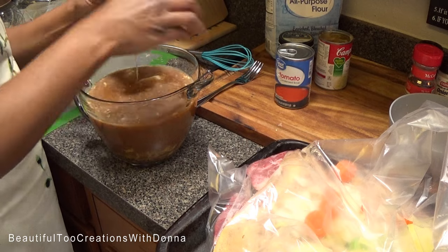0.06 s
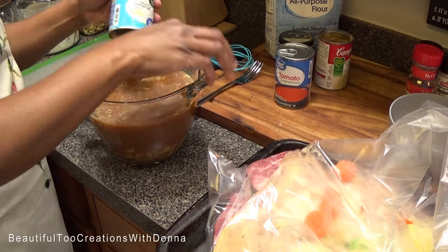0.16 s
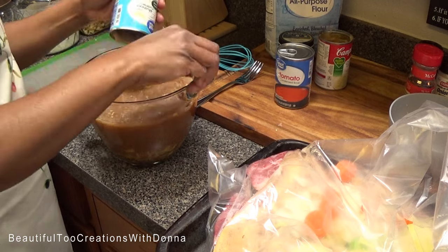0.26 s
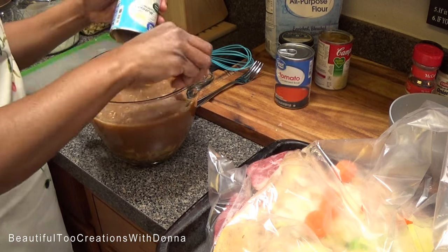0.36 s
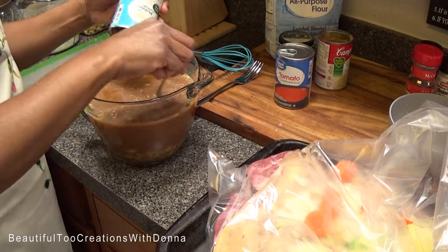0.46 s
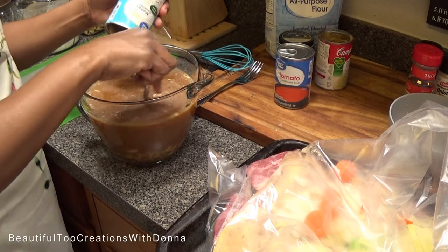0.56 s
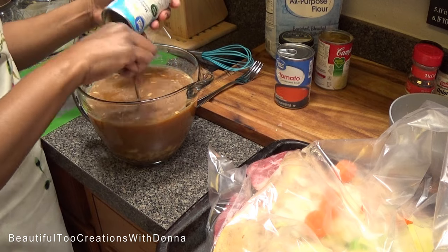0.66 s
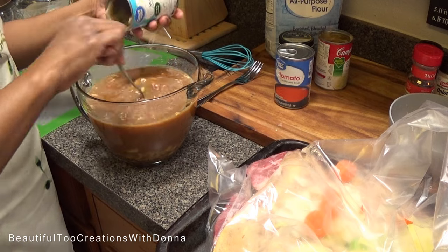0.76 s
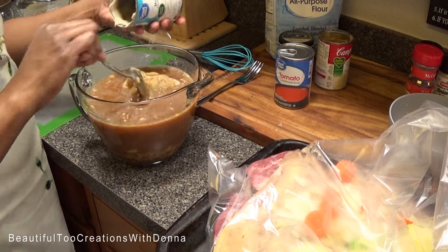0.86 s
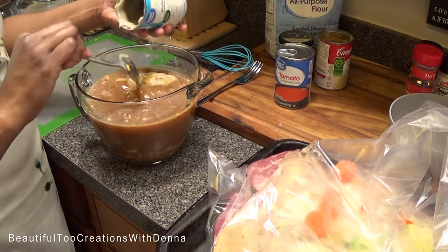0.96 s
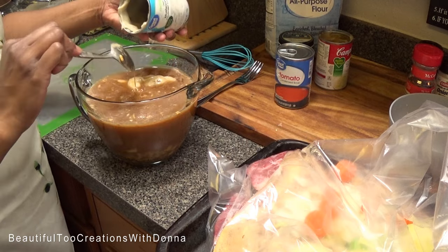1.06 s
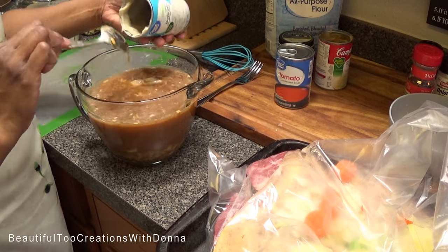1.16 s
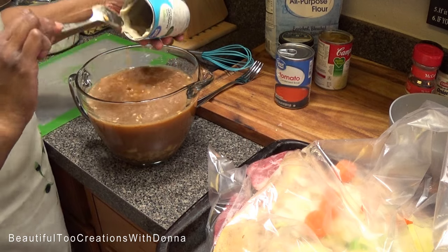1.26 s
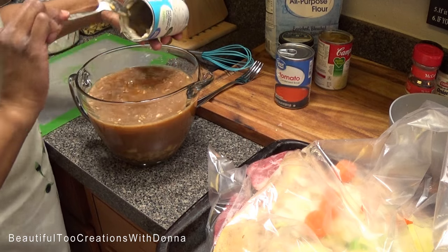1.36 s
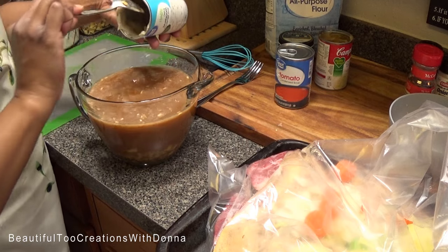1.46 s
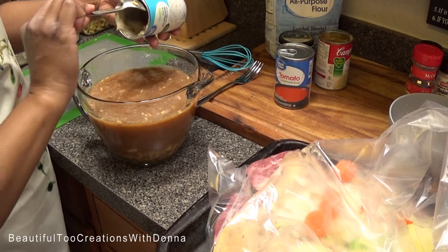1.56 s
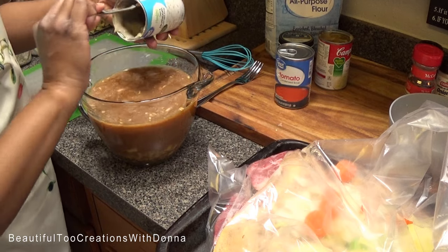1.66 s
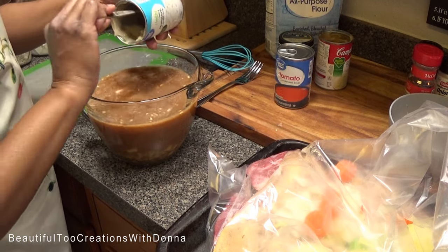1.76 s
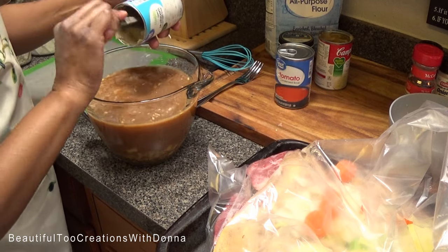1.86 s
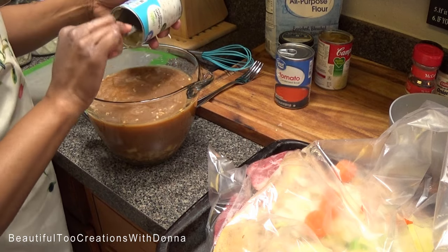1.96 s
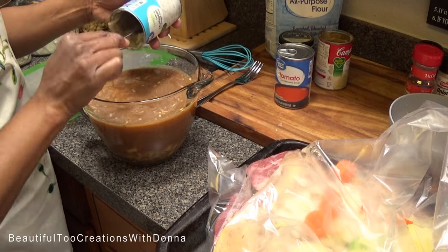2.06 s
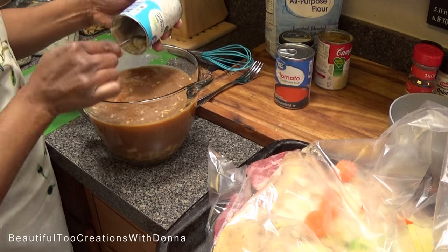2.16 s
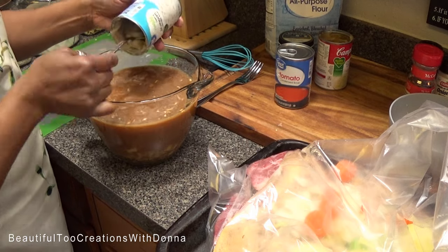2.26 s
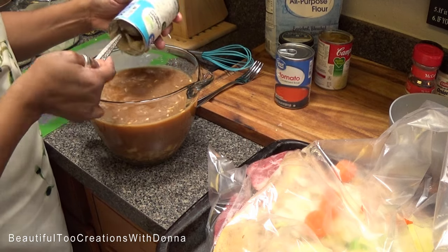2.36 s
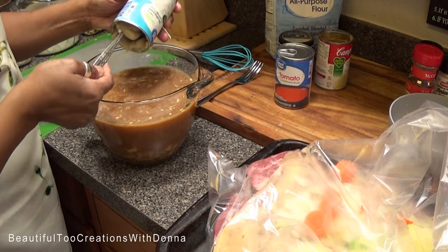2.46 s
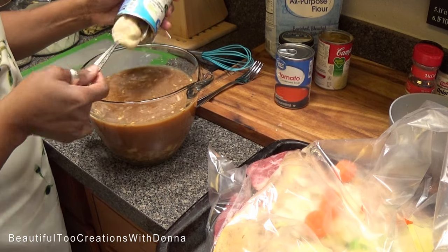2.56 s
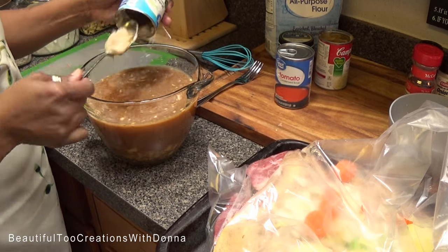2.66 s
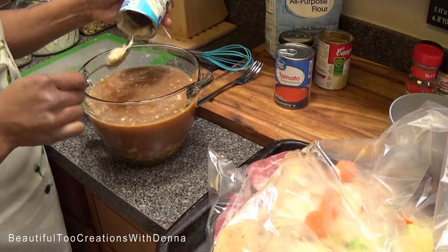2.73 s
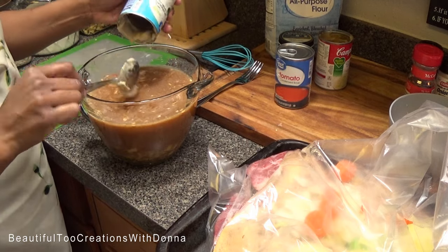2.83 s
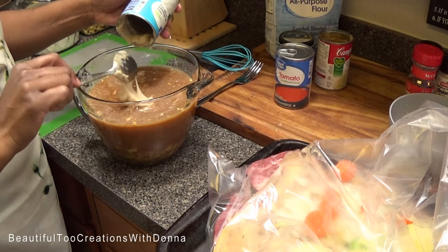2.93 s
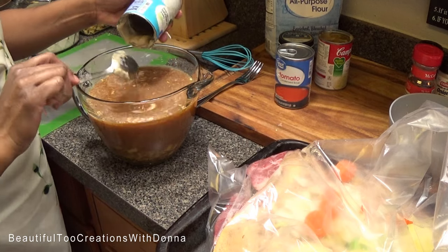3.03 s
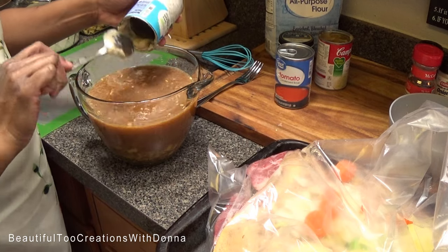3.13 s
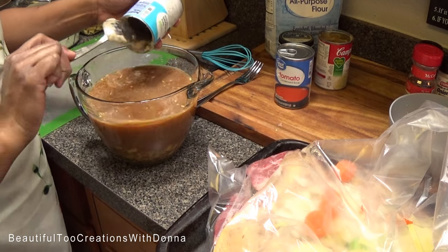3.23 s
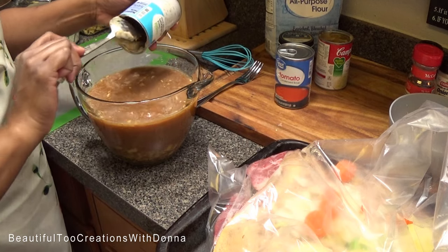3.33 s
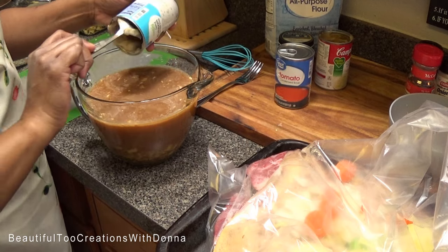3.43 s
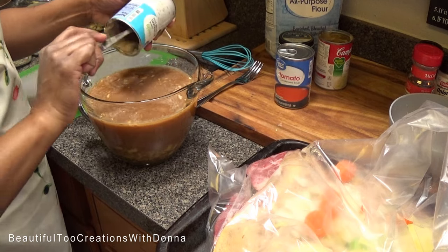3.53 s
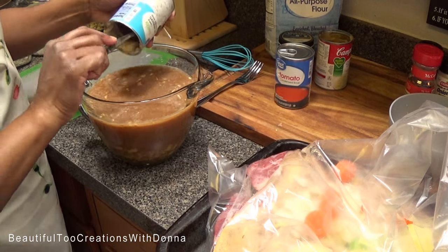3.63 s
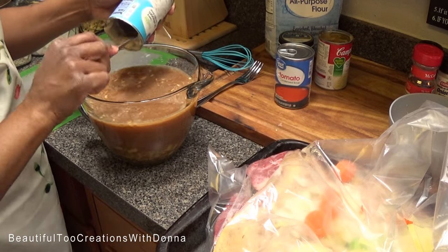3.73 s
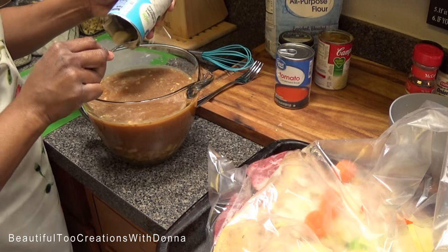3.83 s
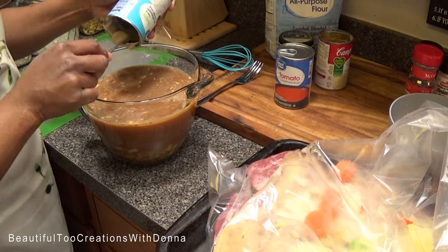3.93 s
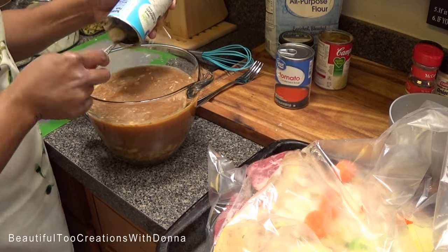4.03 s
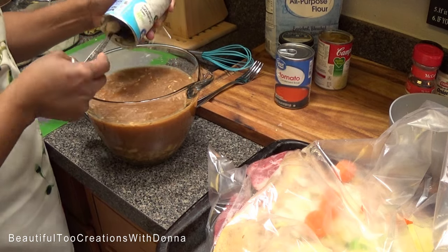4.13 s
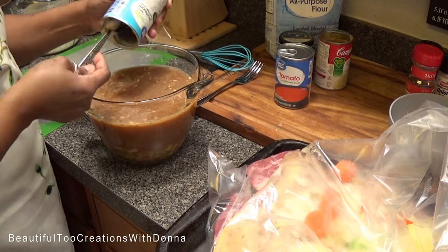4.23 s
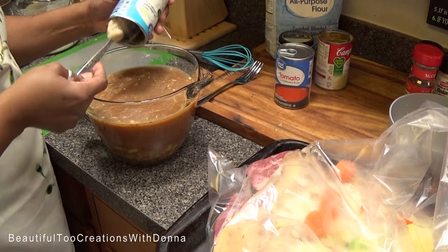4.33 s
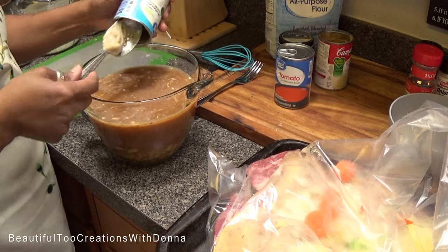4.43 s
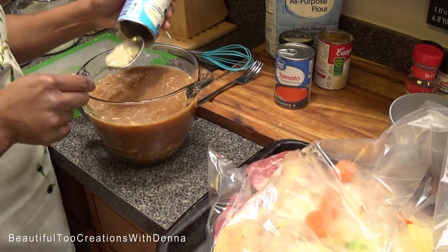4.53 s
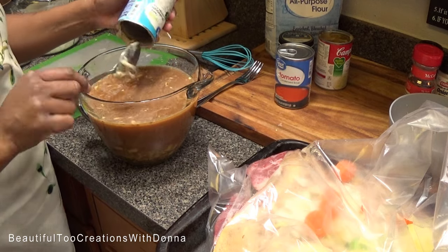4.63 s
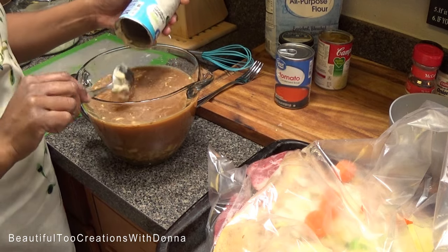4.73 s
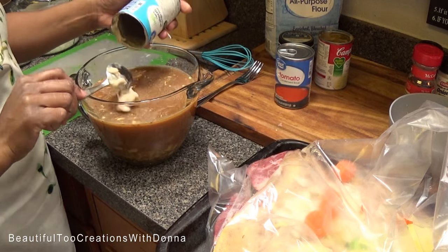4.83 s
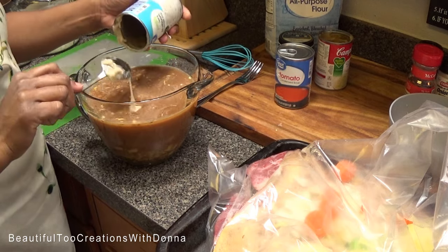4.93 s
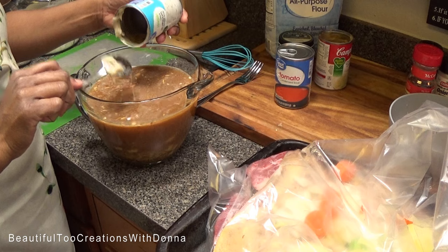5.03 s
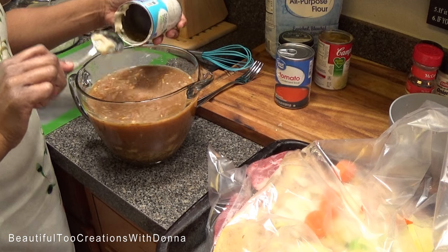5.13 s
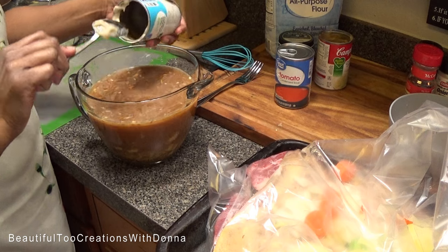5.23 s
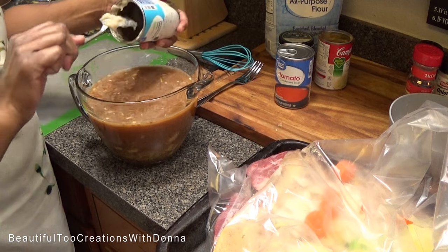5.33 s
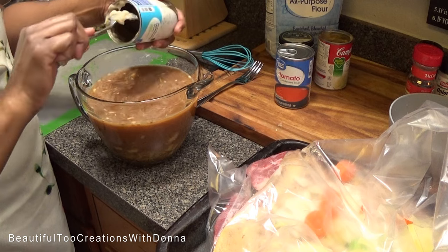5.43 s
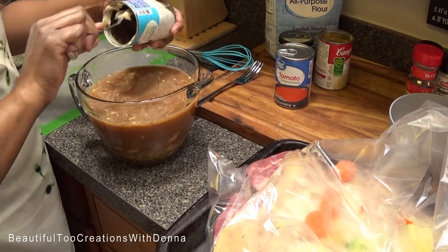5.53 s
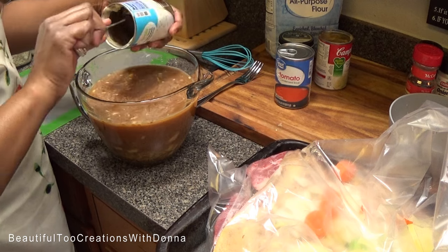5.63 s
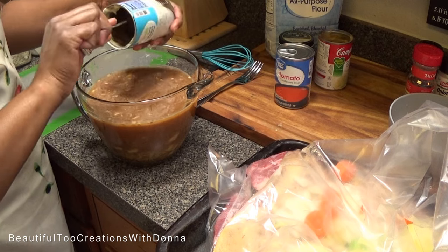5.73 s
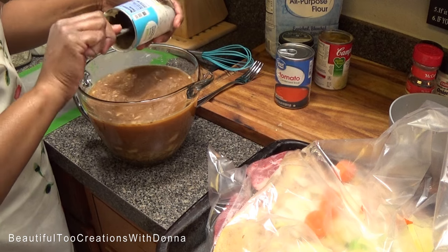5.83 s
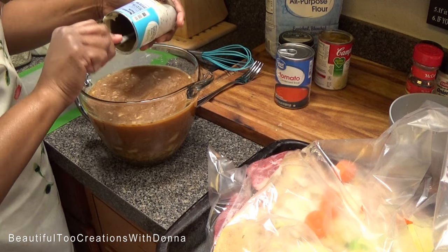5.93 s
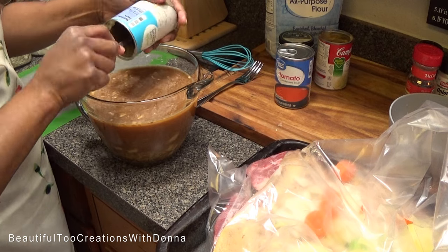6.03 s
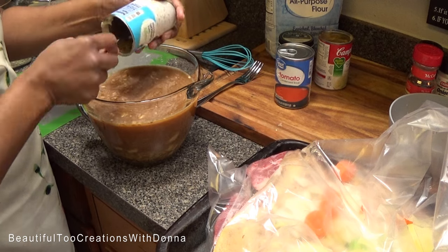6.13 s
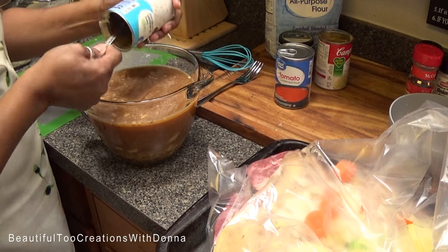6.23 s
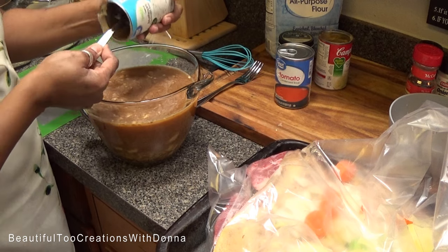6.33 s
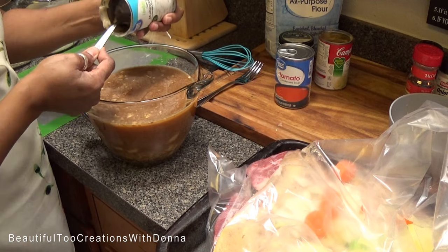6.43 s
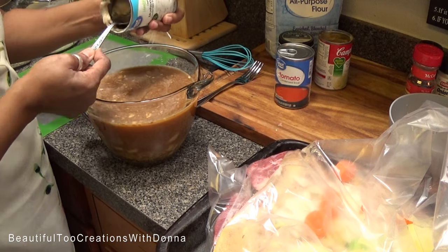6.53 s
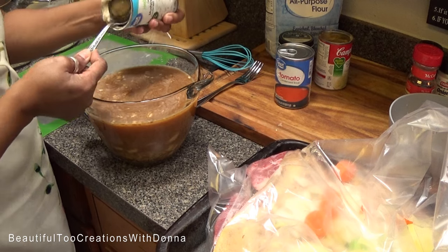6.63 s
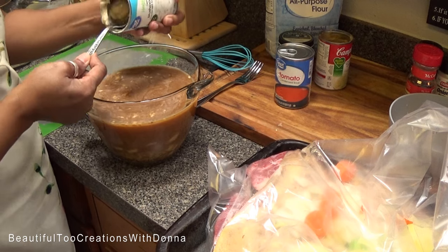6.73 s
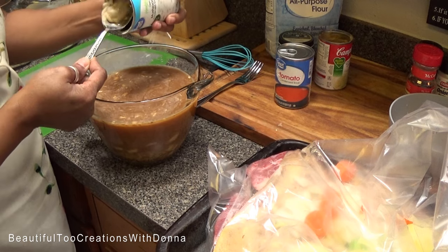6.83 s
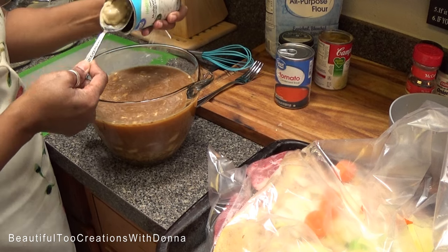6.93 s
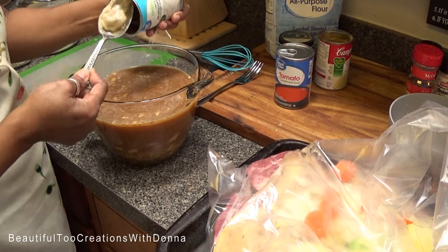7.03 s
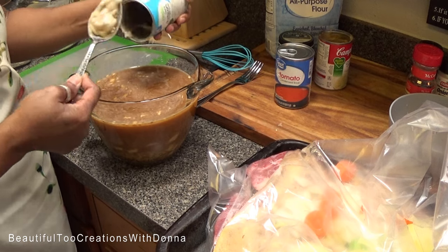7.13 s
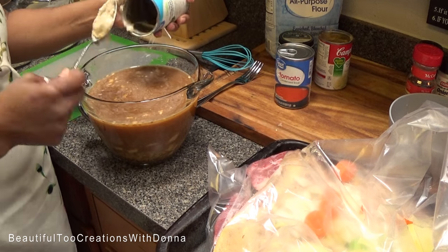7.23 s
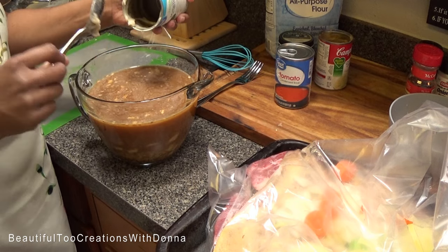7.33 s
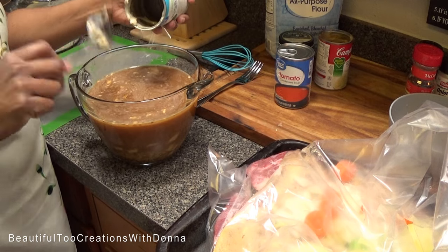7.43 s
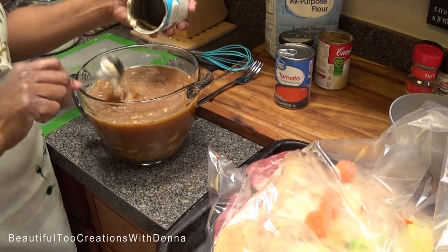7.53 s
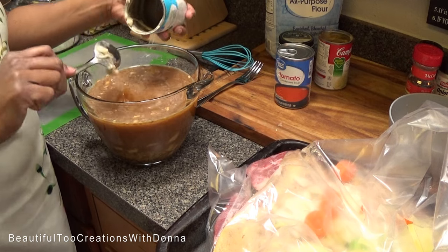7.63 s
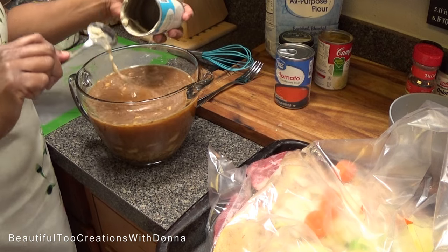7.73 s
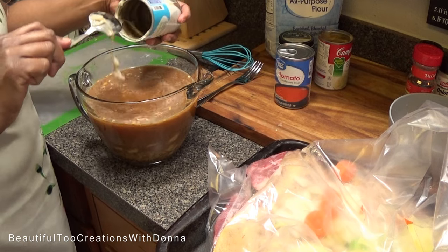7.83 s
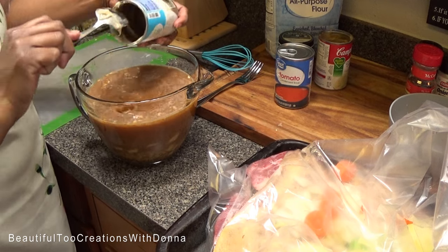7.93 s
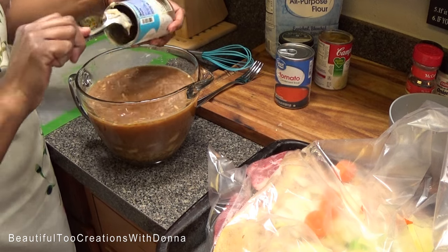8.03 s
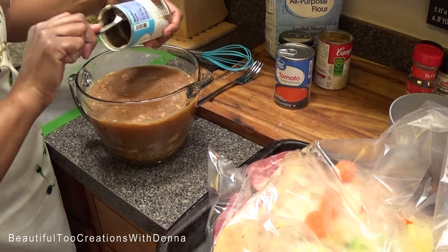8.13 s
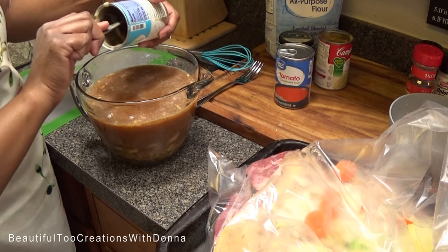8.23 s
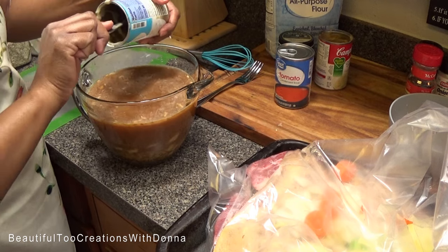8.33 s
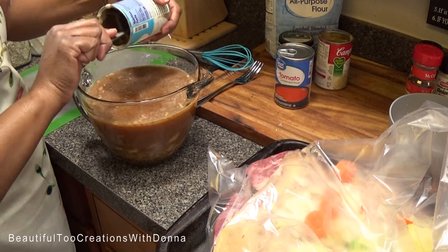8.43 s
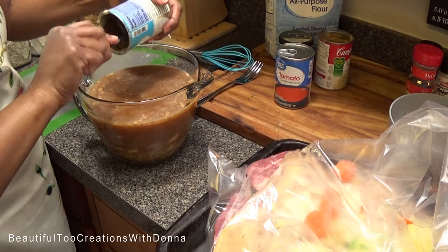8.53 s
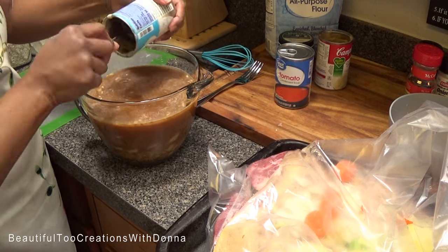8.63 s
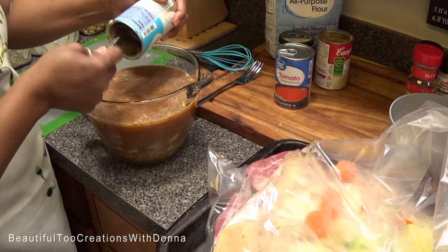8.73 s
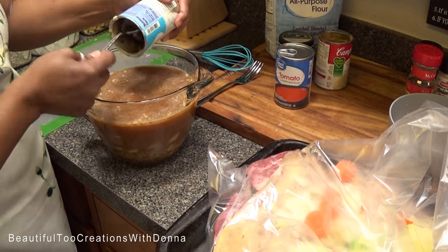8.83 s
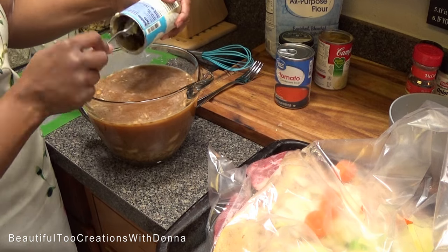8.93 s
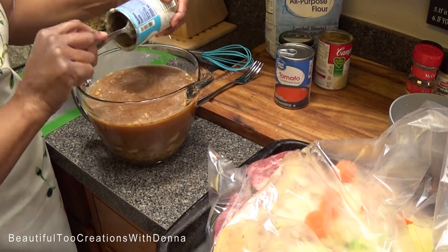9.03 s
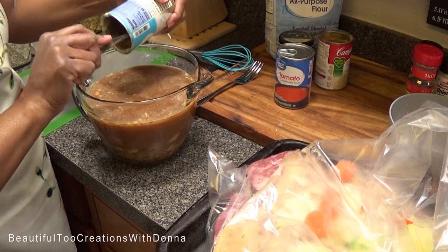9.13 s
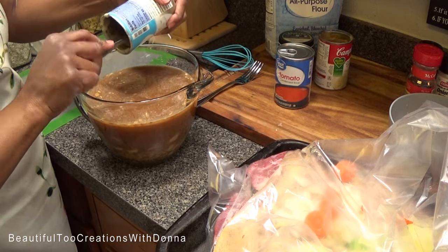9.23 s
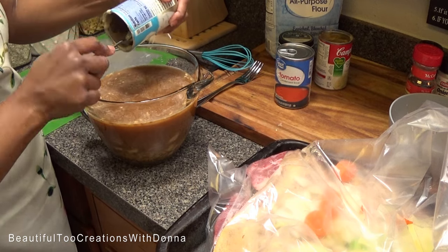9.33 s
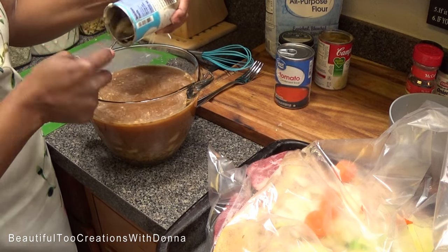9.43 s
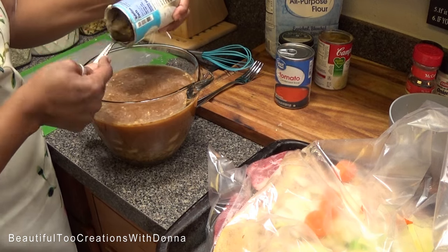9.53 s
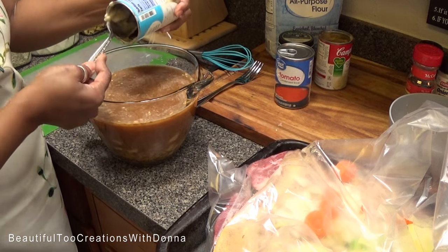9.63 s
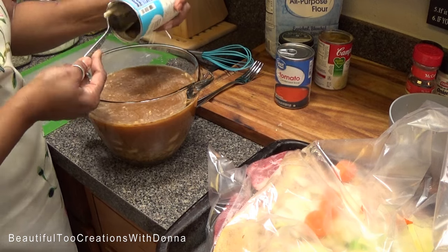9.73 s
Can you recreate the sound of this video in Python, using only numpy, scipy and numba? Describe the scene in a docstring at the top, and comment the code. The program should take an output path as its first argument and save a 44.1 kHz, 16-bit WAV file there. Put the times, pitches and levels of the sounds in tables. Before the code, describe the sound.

A steel spoon works inside a tin can in a kitchen, about a metre from the microphone. It opens with faint scraping, then a soft slosh of soup and small wet smacks around 1 second. At 1.5 seconds a sharp, ringing clink starts a cluster of squeaky scrapes, followed by a soft low bump at 2.3. Separate hollow knocks and scrapes come near 2.6, 3.5 and 4.4 seconds. After a lull, the spoon gets busy from 5.8 to 7.3 seconds, rasping and squeaking along the wall between hard clinks. Another run begins at 8 seconds, with the sharpest knocks around 8.4 and 8.5, then lighter scrapes and taps continue to about 9.8. The room adds a short tail. Faint hiss and a thin high whine run throughout, joined from about 1.4 seconds by faint, rapid lens motor ticking beside the microphone.

```python
"""Spoon in a tin can

A kitchen, stereo camera microphone a metre from a tin can held over a bowl of soup. A steel spoon knocks,
scrapes and squeaks inside: blows and stick-slip friction ring the wall and the air it holds. Soup smacks
and sloshes softly. At the microphone, the lens motor ticks once a frame over faint hiss and whine."""
import sys
import numpy as np
from scipy import signal
from scipy.fft import rfft, irfft, next_fast_len
from scipy.io import wavfile
from scipy.ndimage import uniform_filter1d
from numba import njit

SR = 44100
rng = np.random.default_rng(int(sys.argv[2]) if len(sys.argv) > 2 else 0)


def waveform_to_disk(signal):
    """Save audio, clipped to [-1, 1], as 16-bit WAV at the path in sys.argv[1]."""
    frames = np.transpose(np.atleast_2d(signal))
    scaled = np.clip(frames, -1, 1) * 32767
    samples = np.round(scaled).astype(np.int16)
    wavfile.write(sys.argv[1], SR, samples)


N = 431281
T = np.arange(N) / SR
STEP = 64  # samples per control step
STEP_T = T[::STEP]

# room tone and microphone noise: (frequency [Hz], relative density [dB])
HISS_SPECTRUM = [(25, -31), (60, -5), (130, -13), (300, 0), (640, 2), (1330, 1), (2900, 1), (4700, -2),
                 (8000, -5), (14800, -12.5), (16000, -13.5)]
# slow swell of the hiss: (time [s], gain [dB])
HISS_SWELL = [(0, -3.5), (1.2, -3.5), (2, -4), (4.7, -0.5), (5.4, -2.5), (5.6, -4), (7.5, 0), (9.8, 0)]
# stereo width of the hiss: (frequency [Hz], side against mid [dB])
HISS_WIDTH = [(60, -11), (400, -5), (1300, -2), (4400, -8), (12000, -24)]
# faint hum and whines: (frequency [Hz], rms level [dB])
WHINES = [(120, -87.5), (5846, -72.5), (7865, -79)]
# lens motor ticks, right by the microphone: (time [s], level [dB])
LENS_LEVEL = [(0, -78), (1.3, -68), (1.36, -51), (2.2, -47), (6, -48.5), (9.8, -46)]
# direct sound at the two microphone ports: (frequency [Hz], left phase lead [rad])
PORT_LEAD = [(60, -.3), (250, -.55), (700, -.77), (1500, -.73), (3000, -.55), (6000, -.3), (9000, -.3),
             (12000, -.12)]
# balance between the ports: (frequency [Hz], left minus right [dB])
PORT_PAN = [(250, 0), (700, -1.1), (1300, -.6), (2800, -1.5), (6000, -.3), (12000, 0.1)]
# low bump through the counter: (time [s], level [dB])
BUMP_LEVEL = [(2.1, -100), (2.298, -55.5), (2.55, -73)]
# soup being stirred: (time [s], level [dB])
SLOSH_LEVEL = [(0.7, -71), (0.82, -54.5), (1.0, -69)]
# wet smacks and small clicks: (time [s], peak level [dB], pitch [Hz])
SMACKS = [(0.964, -42.5, 2010), (1.227, -40, 8600), (1.3184, -38, 2830), (1.3324, -41, 3420),
          (1.433, -28.5, 4950), (1.794, -42, 1820), (3.161, -38, 1590), (3.2212, -32, 5200),
          (4.0143, -40, 8900)]
# clear modes of the can, air column near 700 Hz first, then the wall: (frequency [Hz])
MODE_HZ = [635, 712, 785, 850, 1185, 1240, 1297, 1770, 1900, 2090, 2140, 2218, 2375, 2475, 2636, 2842, 3050,
           3170, 3310, 3660, 3995, 4310, 4700, 4893, 5200, 5394, 5695, 6290, 7076, 7600]
# ring of each of those modes: (gain [dB], t60 [s])
MODE_RING = [(-14, 0.5), (13.5, 0.037), (1.5, 0.11), (10, 0.11), (-5.5, 0.33), (8, 0.086), (-22, 0.26),
             (11, 0.019), (-2.5, 0.18), (7, 0.045), (-2.5, 0.23), (-8, 0.29), (4, 0.07), (-7.5, 0.061),
             (7, 0.015), (-4, 0.089), (5, 0.082), (10.5, 0.013), (5.5, 0.055), (17.5, 0.0078), (10, 0.034),
             (2, 0.064), (14.5, 0.0082), (15, 0.012), (5, 0.033), (5, 0.027), (14.5, 0.0082), (10.5, 0.019),
             (-3.5, 0.08), (5, 0.0038)]
# dull thud of can and hand: (frequency [Hz], gain [dB], t60 [s])
THUD_MODES = [(338, 0.5, 0.028), (75, -33, 0.03)]
# air note of the can, higher while the spoon is deep inside: (time [s], pitch [Hz])
AIR_PITCH = [(0, 705), (1.55, 836), (2.1, 775), (2.62, 661), (3.47, 700), (3.58, 682), (4.3, 691),
             (4.46, 667), (5.8, 789), (6.15, 710), (6.3, 833), (6.46, 723), (6.62, 674), (6.86, 598),
             (7.1, 676), (8.1, 877), (8.6, 720), (9.05, 799), (9.17, 677), (9.78, 669)]
# bands of a contact's colour (air, low wall, mid wall, upper wall, rasp, top): (frequency [Hz])
COLOUR_HZ = [700, 1250, 2500, 5000, 9000, 15000]
# clear notes, the spoon sliding on one patch of wall:
# (start [s], slide [s], level [dB], first pitch [Hz], last pitch [Hz], t60 [s])
SLIDES = [(1.545, 0.045, -26.5, 2830, 2857, 0.073), (1.545, 0.086, -48, 2065, 2030, 0.25),
          (1.542, 0.013, -31.5, 840, 833, 0.35), (1.925, 0.0087, -20, 2660, 2660, 0.046),
          (1.995, 0.025, -31, 3010, 3000, .04), (2.012, 0.033, -39, 2116, 2085, 0.19),
          (3.6, 0.071, -54, 2060, 1960, 0.19), (5.836, 0.01, -17.5, 2160, 1914, 0.025),
          (5.895, 0.047, -32, 2360, 2990, 0.022), (6.003, 0.028, -29, 1254, 1234, 0.096),
          (6.153, 0.0066, -12.5, 2950, 2935, 0.024), (6.915, 0.055, -29, 2730, 2214, 0.028),
          (8.078, 0.086, -33, 2167, 2210, 0.2), (8.465, 0.036, -35.5, 1900, 1730, .015),
          (8.47, 0.05, -27, 2140, 2970, .015), (8.487, .018, -29, 3750, 3440, .015),
          (8.526, 0.051, -25.5, 1271, 1293, 0.23), (8.53, 0.022, -23.5, 3330, 3354, 0.036)]
# scrapes along the wall; air, low wall and upper wall count from the level at 2.5 kHz: (start [s],
# swell [s], hold [s], level [dB], air [dB], low wall [dB], upper wall [dB], pitch [Hz], upper pitch [Hz])
STROKES = [(0.0, 0.0013, 0.095, -62, -0.5, 2.5, 9.5, 2900, 3900),
           (0.2, 0.069, 0.032, -59, 0, 6, 5, 2810, 4500),
           (1.542, 0.0028, 0.058, -33.5, -10.5, -7.5, 5.5, 2795, 3920),
           (1.64, 0.023, 0.087, -69, 6, 15, -10, 2880, 3800),
           (1.861, 0.004, 0.092, -51.5, 2, -1, -4, 2900, 5740),
           (1.929, 0.0039, 0.022, -29, -13, -22, -11, 2793, 5070),
           (1.959, 0.013, 0.023, -28.5, -32, -14, -14.5, 2620, 4870),
           (1.99, 0.0073, 0.012, -32, -30, -3, -7, 2975, 7500),
           (2.03, 0.0063, 0.037, -47, -6, 4, -5, 2250, 4170),
           (2.09, 0.021, .47, -57.5, 3.5, 1.5, 3, 2803, 4600),
           (2.57, 0.078, 0.024, -31, -4.5, -8.5, -4, 2790, 4440),
           (3.462, 0.002, 0.019, -34.5, -2, 7, 6.5, 2900, 3890),
           (3.505, 0.028, 0.048, -37, -3, -6.5, 6.5, 2016, 4200),
           (3.66, 0.057, 0.06, -61.5, 2.5, 4, -1, 1960, 4150),
           (3.844, 0.013, 0.051, -51.5, 4.5, -11, -3.5, 2900, 5230),
           (4.08, 0.016, 0.088, -59, 1.5, -7, -1, 2820, 5300),
           (4.17, 0.082, 0.067, -48.5, 6, 7.5, -1, 2870, 4450),
           (4.369, 0.047, 0.033, -44, -1, 2, -4.5, 2540, 4700),
           (4.44, 0.0041, 0.049, -31, -6.5, -6, 0.5, 2682, 4660),
           (5.2, 0.041, .2, -62, -6, 3, 1, 2710, 8050),
           (5.749, 0.033, 0.024, -42, 0.5, -2.5, -4, 2470, 6030),
           (5.839, 0.0052, 0.075, -34, -22, -26, -16, 2050, 3700),
           (5.89, 0.02, 0.025, -29.5, -12.5, -30, -11, 2140, 4770),
           (5.96, 0.022, 0.022, -37, -25, -2, -3.5, 3300, 4470),
           (6.005, 0.0046, 0.18, -43, -10, 0.5, 1.5, 2980, 5170),
           (6.158, 0.003, 0.035, -40, 4, -5, 4.5, 2100, 6400),
           (6.22, 0.0094, 0.12, -46.5, 1.5, -5, -3.5, 1900, 4000),
           (6.319, 0.024, 0.032, -38.5, -8.5, 2, -7, 3106, 4950),
           (6.45, 0.0082, 0.12, -50, 3.5, 2.5, -5, 2180, 3800),
           (6.549, 0.015, 0.058, -40.5, 0, -4.5, -10, 2950, 4600),
           (6.65, 0.029, 0.086, -48.5, 6, 1, -5, 2930, 4440),
           (6.84, 0.042, 0.036, -31.5, -5, -7.5, -8.5, 2916, 5050),
           (6.919, 0.011, 0.048, -32, -8, -4.5, -2, 2930, 4800),
           (7.009, 0.0084, 0.094, -40.5, 1.5, -2, -3.5, 2990, 4900),
           (7.072, 0.0092, 0.045, -27, -5.5, -3, -8.5, 2205, 4650),
           (7.14, 0.03, 0.055, -31.5, -14, -3.5, 0.5, 2153, 4000),
           (7.216, 0.006, 0.026, -37.5, -2.5, 9, 3.5, 2180, 6600),
           (7.689, 0.0044, 0.012, -51, -11, -4, 6, 3370, 3800),
           (8.066, 0.0045, 0.045, -25.5, -22, -10, 5, 2180, 5430),
           (8.127, 0.0062, 0.027, -28.5, -21, -6.5, 7.5, 2180, 5220),
           (8.22, 0.024, 0.15, -52.5, -4, 0, -0.5, 2180, 5720),
           (8.378, 0.0039, 0.036, -26, -18, -23, -8.5, 2390, 4060),
           (8.448, 0.09, 0.033, -29, -12, -32, 5.5, 2380, 4140),
           (8.527, 0.0025, 0.025, -22, -16, -16, -3, 2540, 6840),
           (8.634, 0.0034, 0.11, -40, -7.5, -8, -1.5, 2460, 6700),
           (8.735, 0.0039, 0.053, -35.5, -13.5, -22, 4.5, 1940, 4000),
           (8.856, 0.0037, 0.11, -50.5, 4, 5.5, 1, 2950, 4600),
           (8.98, 0.014, 0.061, -38.5, 1.5, -2, -3, 2510, 5100),
           (9.109, 0.0049, 0.052, -43, 0, -4, -2, 2940, 4500),
           (9.23, 0.016, 0.16, -60, -2, -9, -33, 2940, 5850),
           (9.34, 0.0088, 0.021, -49, 8, 12, 1.5, 1810, 4850),
           (9.429, 0.0042, 0.0092, -54, 11.5, 9, 0.5, 3240, 4900),
           (9.499, 0.045, 0.02, -47, 10.5, 6.5, -1, 2220, 4650),
           (9.578, 0.0046, 0.019, -36, 0, 2.5, -2.5, 2730, 4620),
           (9.64, 0.025, 0.074, -42, 7, -9, -4.5, 2915, 4620),
           (9.74, 0.023, .03, -43, 0, -8, -3, 2590, 5660)]
# knocks on the wall, coloured in the same way:
# (time [s], level [dB], air [dB], low wall [dB], upper wall [dB], pitch [Hz], upper pitch [Hz])
BLOWS = [(1.538, -3, 0, -7.5, -1.5, 2830, 3634), (1.866, -45, 3, 5, 17.5, 2980, 6000),
         (1.924, -10.5, -3, -4, 0.5, 2430, 5130), (2.0694, -33.5, 2, -1, -2.5, 2170, 3970),
         (2.6414, -20, 15, -11, -1, 2970, 4450), (3.458, -12.5, 8, -4, -0.5, 2240, 3990),
         (3.706, -43, 17.5, -17, 5, 2050, 4200), (3.8554, -36.5, 15.5, -3, -21, 3050, 4200),
         (4.4438, -18.5, 9.5, -3, -19, 2570, 4860), (5.7653, -43, 23, -2, 6, 2440, 4400),
         (5.835, -4.5, -8, -22, -15.5, 2070, 3940), (6.0008, -3.5, -3.5, -31, 1.5, 3124, 4400),
         (6.1521, -7, 8, 0.5, 0, 2810, 4040), (6.4517, -21, -2, -12, 0, 2037, 3780),
         (6.609, -33.5, -7, 4, 4, 2920, 5200), (6.629, -32, 3, 0, 0, 2950, 5070),
         (6.6588, -46.5, 30, -32, 8, 2960, 5300), (6.684, -34, -1, -9, -13, 2890, 4530),
         (6.703, -27, -9, -27, -4.5, 2970, 5340), (6.727, -32, 6, 9, -6, 2850, 4700),
         (7.21, 0.5, -11, -8.5, -5, 3403, 6120), (7.655, -18, -15, -76, -8.5, 2920, 4500),
         (7.691, -36.5, -31, -48, 15, 3200, 3620), (8.0631, -12.5, 5, 5.5, 2, 2260, 5700),
         (8.3747, 4, -17.5, -19.5, -6.5, 2484, 1760), (8.5229, -1.5, -25, -3.5, 1, 2333, 6500),
         (8.628, -19, 10.5, 6.5, 8.5, 3090, 6900), (8.9493, -34, 14, -13, 9.5, 2570, 5070),
         (8.9902, -23.5, 6, 2, 9.5, 2230, 4500), (9.0125, -44, -5, -3, 27.5, 2700, 4830),
         (9.0304, -14.5, 8, 1.5, 6.5, 2300, 5070), (9.1132, -25.5, 14.5, -3, -6, 2940, 4700),
         (9.229, -32.5, 1, 3, 3, 3110, 5030), (9.359, -25.5, 9, -5, -5.5, 1680, 3910),
         (9.587, -23, -6, -8, -7, 2610, 4580), (9.659, -20.5, 0, -26, -9, 2965, 4520),
         (9.711, -18.5, -13, 1, -7.5, 3370, 5200)]


def undb(db):
    """Decibels to amplitude."""
    return 10 ** (np.asarray(db) / 20)


def unit(x):
    """Scale to an rms of 1."""
    return x / np.sqrt(np.mean(x ** 2))


def held(steps):
    """Hold each control value for STEP samples."""
    return np.repeat(steps, STEP)[:N]


def envelope(table, off_db=-110):
    """Amplitude through (time, level) points, silent before and after."""
    points = [(table[0][0] - .004, off_db), *table, (table[-1][0] + .02, off_db)]
    return held(undb(np.interp(STEP_T, *np.transpose(points))))


def over_hz(table, hz):
    """Read a (frequency, value) table along a log frequency axis."""
    points_hz, values = np.transpose(table)
    return np.interp(np.log(hz + 1), np.log(points_hz + 1), values)


def band(x, lo_hz, hi_hz):
    """Gentle band-pass."""
    return signal.sosfilt(signal.butter(2, [lo_hz, hi_hz], "band", fs=SR, output="sos"), x)


def smooth(x, width):
    """Moving average, applied twice."""
    return uniform_filter1d(uniform_filter1d(x, width), width)


def drift(per_s):
    """Smooth random motion of rms 1, one value per control step."""
    return unit(smooth(rng.standard_normal(len(STEP_T)), max(int(SR / STEP / per_s), 2)))


def room_tone(hiss_db=-53):
    """Kitchen air and microphone noise, partly unlike left and right, with thin whines in the centre."""
    n = next_fast_len(N)
    hz = np.fft.rfftfreq(n, 1 / SR)
    mid, side = rfft(rng.standard_normal((2, n))) * undb(over_hz(HISS_SPECTRUM, hz))
    side *= undb(over_hz(HISS_WIDTH, hz))
    hiss = unit(irfft([mid + side, mid - side], n)[:, :N])
    hiss *= undb(hiss_db + np.interp(T, *np.transpose(HISS_SWELL)))
    wobble = np.cumsum(rng.standard_normal(N)) * 0.019
    return hiss + sum(np.sqrt(2) * undb(db) * np.sin(2 * np.pi * f * T + wobble) for f, db in WHINES)


def lens_motor(frame_hz=29.97, ring_hz=2878, ping_s=0.0025, click_s=0.0011):
    """Beside the microphone the motor steps every frame: a short ping one way, a drier click back."""
    frames = np.arange(1, int(N / SR * frame_hz))
    at = ((frames / frame_hz - .006) * SR).astype(int)
    size = undb(np.interp(at / SR, *np.transpose(LENS_LEVEL)) + 1.4 * rng.standard_normal(len(at)))
    lag = np.arange(1024) / SR
    out = np.zeros(N)
    for first, decay_s, db in [(0, ping_s, 0), (1, click_s, 1)]:
        kicks = np.zeros(N)
        kicks[at[first::2]] = size[first::2] * undb(db)
        tick = lag / decay_s * np.exp(1 - lag / decay_s) * np.sin(2 * np.pi * ring_hz * lag)
        out += signal.fftconvolve(kicks, tick)[:N]
    return out


def kitchen(source, room_db=-8.5, t60=0.43, low_hz=199, high_hz=4900):
    """A metre off, direct sound meets the two ports slightly out of phase; the room adds a short tail."""
    n = next_fast_len(N + SR)
    hz = np.fft.rfftfreq(n, 1 / SR)
    left = np.exp(.5j * over_hz(PORT_LEAD, hz)) * undb(over_hz(PORT_PAN, hz) / 2)
    direct = np.array([left, 1 / left])
    lag = np.arange(SR // 2) / SR
    tail = rng.standard_normal((2, len(lag))) * 1000 ** (-lag / t60) * (lag > .004)
    tail /= np.sqrt(np.sum(tail[0] ** 2))
    room_colour = undb(room_db) / (1 + (hz / high_hz) ** 2) * hz / (hz + low_hz)
    return irfft(rfft(source, n) * (direct + rfft(tail, n) * room_colour), n)[:, :N]


def counter_bump():
    """One soft, low bump carried through the counter."""
    return envelope(BUMP_LEVEL) * unit(band(rng.standard_normal(N), 47, 410))


def soup(smack_t60=0.024, bubbles_per_s=900):
    """Short wet smacks and a stirred slosh of tiny bubbles."""
    out = np.zeros(N)
    lag = np.arange(2048) / SR
    for start, db, hz in SMACKS:
        burst = rng.standard_normal(len(lag)) * 1000 ** (-lag / smack_t60)
        smack = band(burst, hz / 1.1, hz * 1.21)
        i = int(start * SR)
        out[i:i + len(lag)] += undb(db) * smack / np.abs(smack).max()
    bubbles = (rng.random(N) < bubbles_per_s / SR) * rng.standard_normal(N)
    return out + envelope(SLOSH_LEVEL) * unit(band(bubbles, 1000, 1840))


def sliding_notes(onset_s=0.0013):
    """Each note glides while the spoon slides, fluttering with the drag, then rings out."""
    out = np.zeros(N)
    lag = np.arange(SR // 2) / SR
    for start, slide_s, db, from_hz, to_hz, t60 in SLIDES:
        hz = from_hz + (to_hz - from_hz) * np.minimum(lag / slide_s, 1)
        rough = .14 + .45 * abs(np.log2(to_hz / from_hz)) / slide_s  # faster glide, more stick-slip
        drag = smooth(rng.standard_normal((2, len(lag))), int(max(140 / (1 + rough), 85)))
        flutter = (1 + rough * (unit(drag[0]) + 1j * unit(drag[1]))) / np.sqrt(1 + 2 * rough ** 2)
        tone = (flutter * np.exp(2j * np.pi * np.cumsum(hz) / SR)).imag
        shape = (1 - np.exp(-lag / onset_s)) * 1000 ** (-np.maximum(lag - slide_s, 0) / t60)
        i = int(start * SR)
        out[i:i + len(lag)] += np.sqrt(2) * undb(db) * shape * tone
    return out


@njit
def ring(slips, gain, knocks, hz, t60, feed_t60):
    """One mode, fed through a short resonance that keeps its skirts steep; gain and hz move in steps."""
    out, feed, mode = np.empty(len(slips)), 0j, 0j
    decay, feed_decay = 1000 ** (-1 / (t60 * SR)), 1000 ** (-1 / (feed_t60 * SR))
    for k in range(len(hz)):
        turn = np.exp(2j * np.pi * hz[k] / SR)
        for i in range(STEP * k, min(STEP * (k + 1), len(slips))):
            force = slips[i] * gain[k] + knocks[i] + 1e-18
            feed = feed * feed_decay * turn + (1 - feed_decay) * force
            mode = mode * decay * turn + feed
            out[i] = mode.real
    return out


def stick_slip(slips_per_s=9000, spread_db=2, catch_db=1.5, catches_per_s=80):
    """Friction of steel on tin: tiny uneven slips, surging as the spoon catches and lets go."""
    slipping = rng.random(N) < slips_per_s / SR
    slips = slipping * undb(spread_db * rng.exponential(size=N)) * rng.standard_normal(N)
    return unit(slips * held(undb(catch_db * drift(catches_per_s))))


def scraping_contact(swell_db=20.5, fade_db_per_s=464):
    """Strokes swell, hold and fade as the spoon eases off; the loudest sets level, colour and pitches."""
    start, swell, hold, level, air, low, upper, pitch, upper_pitch = np.transpose(STROKES)
    age = STEP_T[:, None] - start
    risen = np.clip(age / swell, 0, 1)
    db = level - swell_db * (1 - risen) - fade_db_per_s * np.maximum(age - swell - hold, 0)
    db = np.where(age < 0, -200, db)
    lead = db.argmax(axis=1)
    # during the swell, the contact slides over from the pitch of the stroke before
    slid = risen[np.arange(len(age)), lead]
    glide = pitch[np.maximum(lead - 1, 0)] ** (1 - slid) * pitch[lead] ** slid
    return db.max(axis=1), air[lead], low[lead], upper[lead], glide, upper_pitch[lead]


def drive_db(contact, hz, focus_db, focus_width=0.028, rasp_db=3.5, top_db=-19):
    """How hard a contact drives the mode at hz: its level and colour, and more near its two pitches."""
    level, air, low, upper, pitch, upper_pitch = contact
    bands = [air, low, 0, upper, upper + rasp_db, upper + rasp_db + top_db]
    place = np.interp(np.log(hz), np.log(COLOUR_HZ), range(6))
    k = min(int(place), 4)
    colour = bands[k] + (place - k) * (bands[k + 1] - bands[k])
    nearness = sum(share * np.exp(-(np.log(hz / contact_hz) / focus_width) ** 2)
                   for contact_hz, share in [(pitch, 1), (upper_pitch, .5)])
    return level + colour + focus_db * nearness


def squeaks_and_air(slips, contact, firm_db=-40):
    """Friction rings both contact pitches and the air in the can; uneven drag shakes all three."""
    level, air, _, upper, pitch, upper_pitch = contact
    eased_db = .6 * np.minimum(level - firm_db, 0)  # squeaks need pressure, so they die away first
    air_hz = np.interp(STEP_T, *np.transpose(AIR_PITCH))

    def voice(db, hz, t60, judder):
        shaken_hz = hz * (1 + judder * drift(70))
        return ring(slips, undb(level + db), np.zeros(N), shaken_hz, t60, feed_t60=0.017)

    return (voice(eased_db + 12.5, pitch, t60=.04, judder=.022)
            + voice(eased_db + upper + 18, upper_pitch, t60=.008, judder=.022)
            + voice(air + 23, air_hz, t60=.048, judder=.015))


def spoon_knocks(hz, chatter_s=0.004):
    """Force of the blows on the mode at hz: each is a brief rattle of steel against the wall."""
    start, *contact = np.transpose(BLOWS)
    lag = np.arange(768)
    at = (start * SR).astype(int)[:, None] + lag
    push = np.exp(-lag / SR / chatter_s)
    rattle = push / np.sqrt(np.sum(push ** 2)) * rng.standard_normal(at.shape)
    share = np.abs(rattle @ np.exp(2j * np.pi * hz * lag / SR))
    rattle /= np.clip(share, .7, 1.6)[:, None]  # each mode gets a fairly even share
    force = np.zeros(N)
    force[at] = rattle * undb(drive_db(contact, hz, focus_db=19.5))[:, None]
    return force


def tin_can(dense_db=14, dense_cycles=22, wander_db=3, feed_cycles=8.1, bass_hz=436):
    """Scrapes and knocks ring the can's clear modes and the crowded short ones between them."""
    slips, contact = stick_slip(), scraping_contact()
    clear_modes = [(hz, db, t60) for hz, (db, t60) in zip(MODE_HZ, MODE_RING)] + THUD_MODES
    modes = clear_modes + [(hz, dense_db, dense_cycles / hz) for hz in np.geomspace(950, 15000, 26)]
    # the modes around 2.5 kHz set the scale for both kinds of contact
    mid_db, mid_t60 = np.transpose([(db, t60) for hz, db, t60 in modes if 1700 < hz < 3500])
    rub_scale = np.sqrt(np.sum(undb(2 * mid_db) * mid_t60) * SR / (4 * np.log(1000)))
    blow_scale = np.sqrt(np.sum(undb(2 * mid_db)))
    out = np.zeros(N)
    for k, (hz, db, t60) in enumerate(modes):
        dense = k >= len(clear_modes)
        wander = wander_db * drift(14)  # the contact crosses nodes and bellies
        rub_gain = undb(db + drive_db(contact, hz, focus_db=13.5) + wander) / rub_scale
        knock_db = db - 9 if dense and hz < 7500 else db  # blows favour the clear modes
        knocks = spoon_knocks(hz) * undb(knock_db) / blow_scale
        bend = .003 + dense * .04 * np.clip(np.log2(hz / 3000), 0, 1)  # the grip bends the treble most
        out += ring(slips, rub_gain, knocks, hz * (1 + bend * drift(7.7)), t60, feed_cycles / hz)
    out += squeaks_and_air(slips, contact) / rub_scale
    # a small can radiates little bass
    return signal.sosfilt(signal.butter(1, bass_hz, "high", fs=SR, output="sos"), out)


def scene():
    """Can and soup a metre away in the kitchen; lens motor and room tone right at the microphone."""
    at_counter = tin_can() + sliding_notes() + soup() + counter_bump()
    return kitchen(at_counter) + lens_motor() + room_tone()


def record(dry):
    """The recorder clips just under full scale and cuts the top above 15.9 kHz."""
    top_cut = signal.ellip(10, .2, 70, 15900, fs=SR, output="sos")
    return signal.sosfilt(top_cut, np.clip(dry, -.97, .97))


dry = scene()
out = record(dry)
waveform_to_disk(out)
```